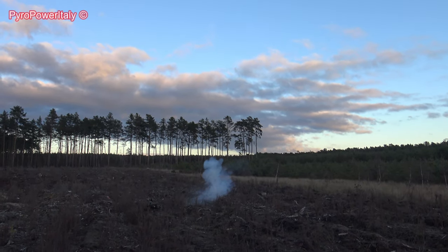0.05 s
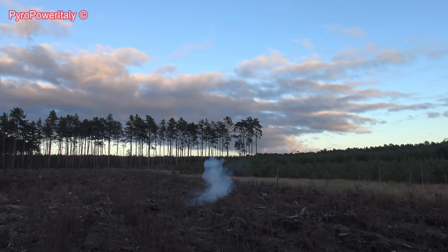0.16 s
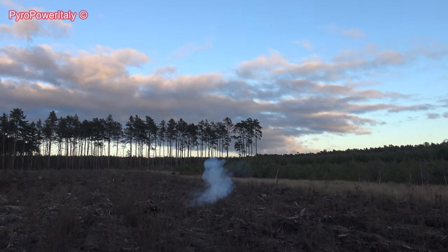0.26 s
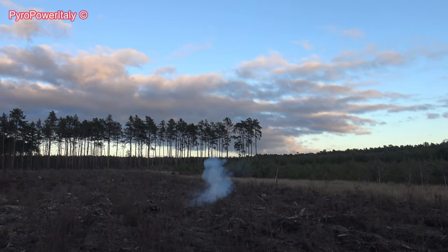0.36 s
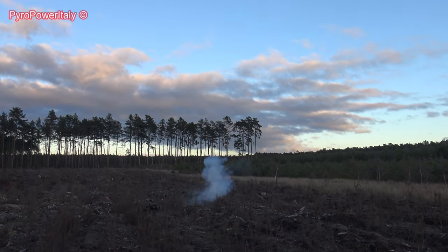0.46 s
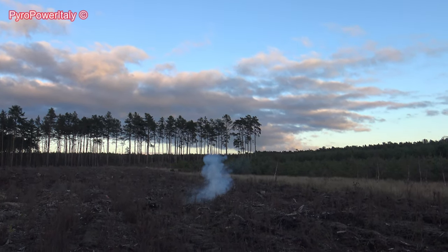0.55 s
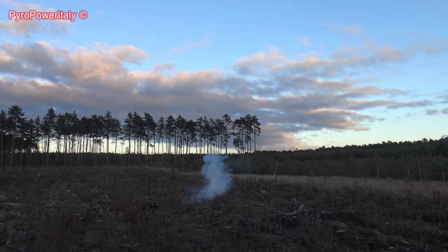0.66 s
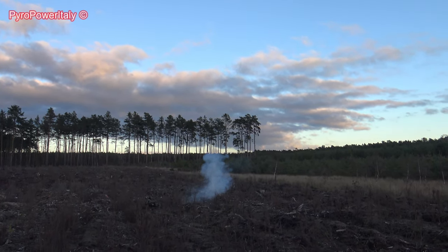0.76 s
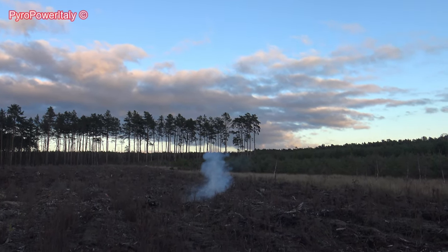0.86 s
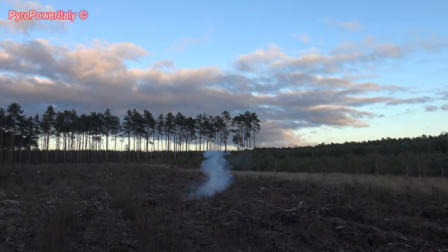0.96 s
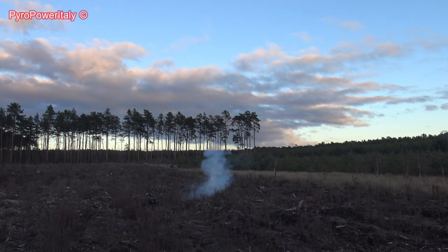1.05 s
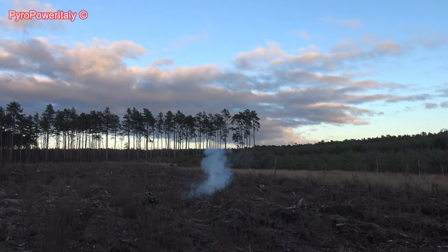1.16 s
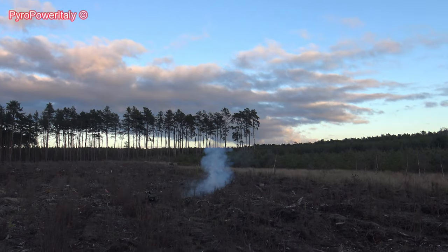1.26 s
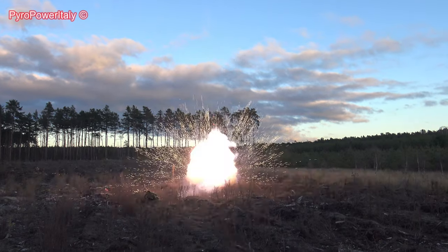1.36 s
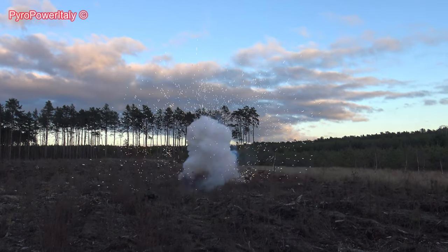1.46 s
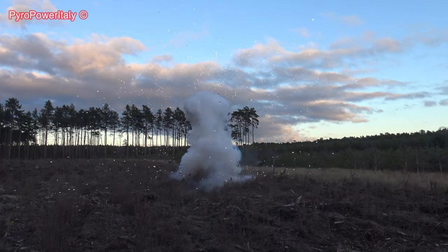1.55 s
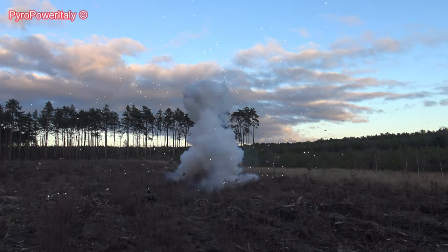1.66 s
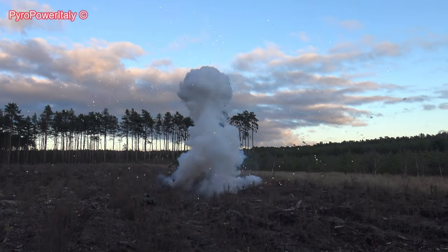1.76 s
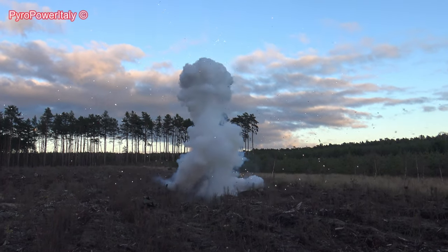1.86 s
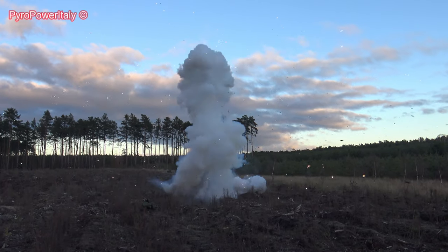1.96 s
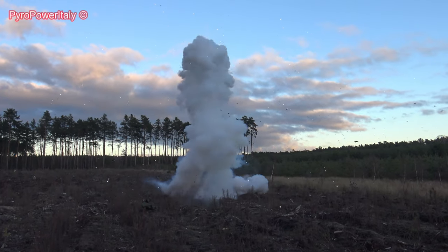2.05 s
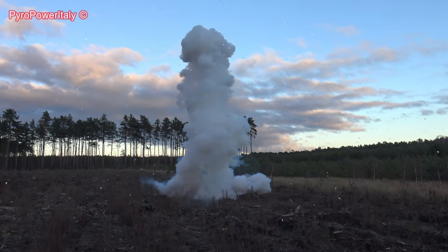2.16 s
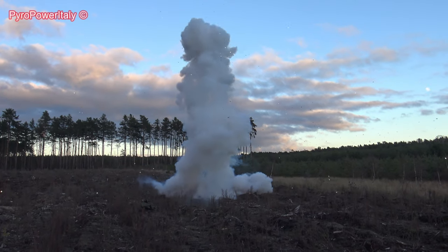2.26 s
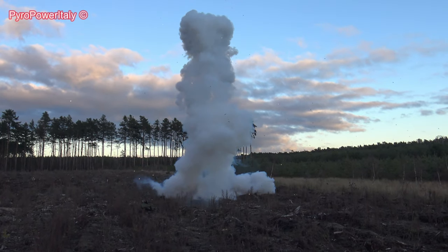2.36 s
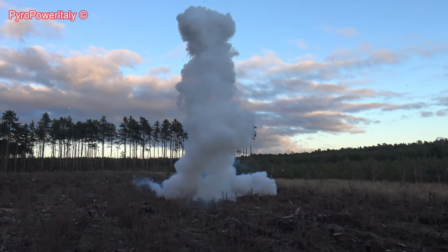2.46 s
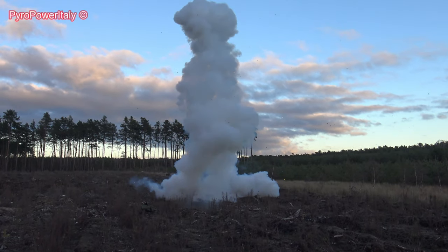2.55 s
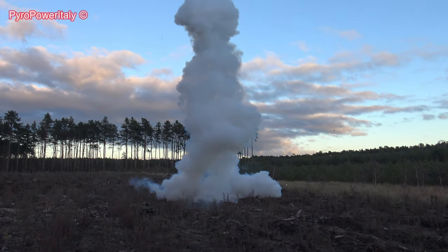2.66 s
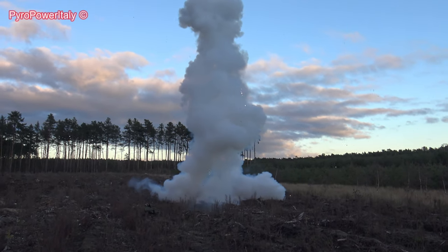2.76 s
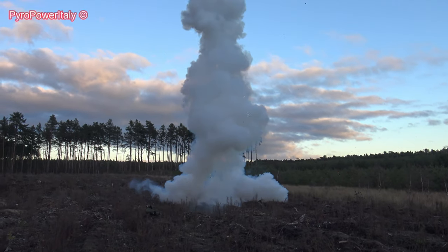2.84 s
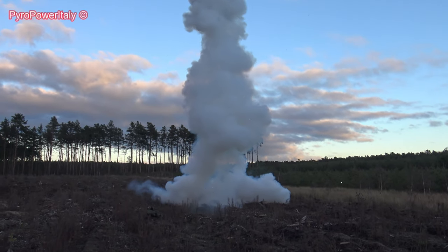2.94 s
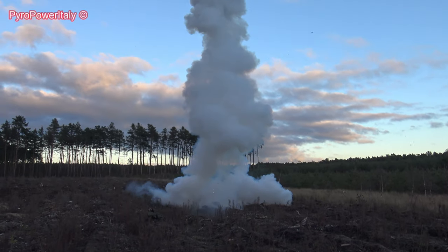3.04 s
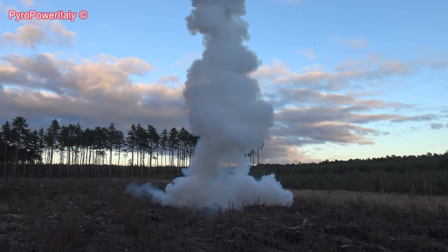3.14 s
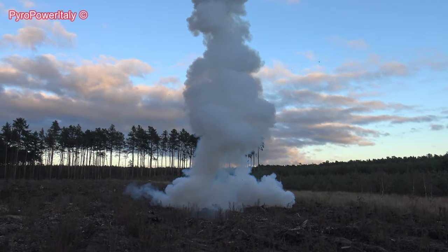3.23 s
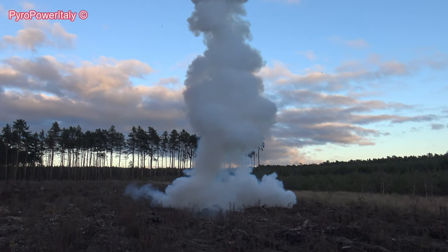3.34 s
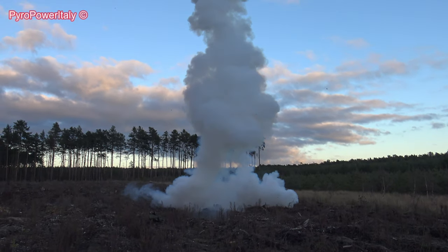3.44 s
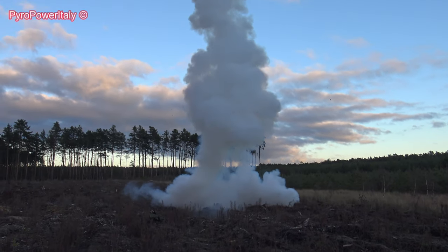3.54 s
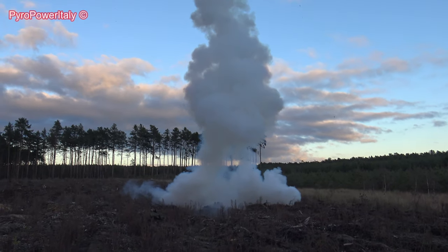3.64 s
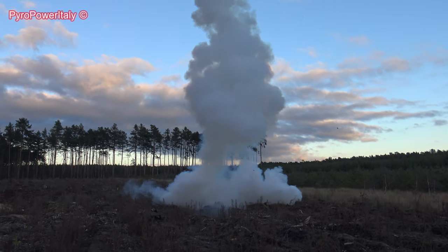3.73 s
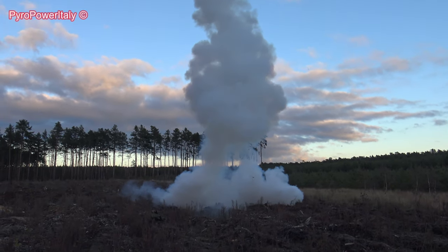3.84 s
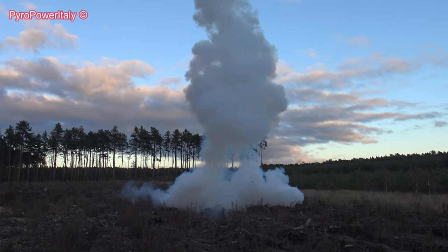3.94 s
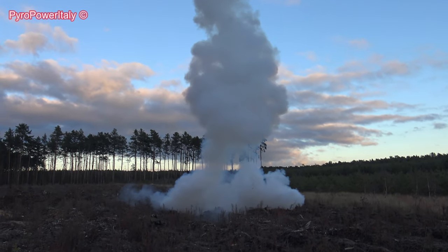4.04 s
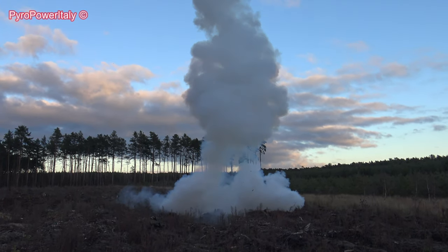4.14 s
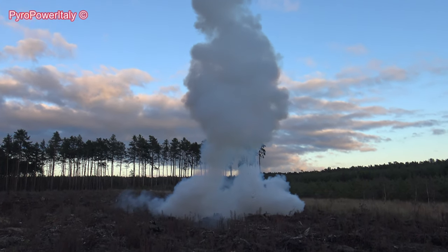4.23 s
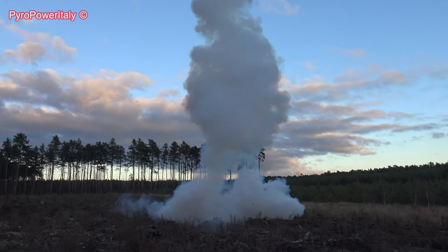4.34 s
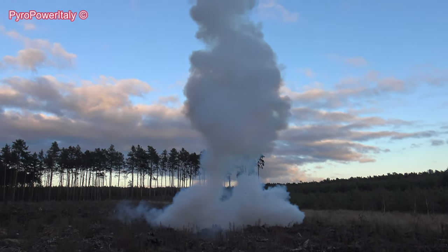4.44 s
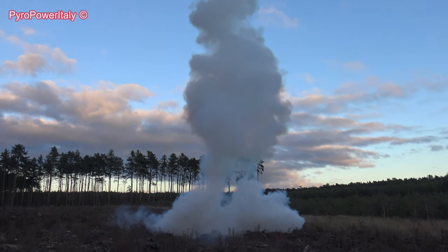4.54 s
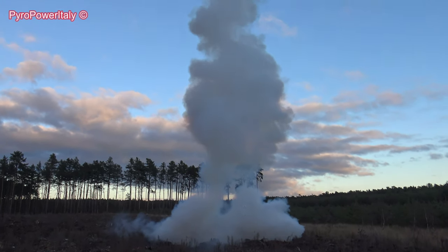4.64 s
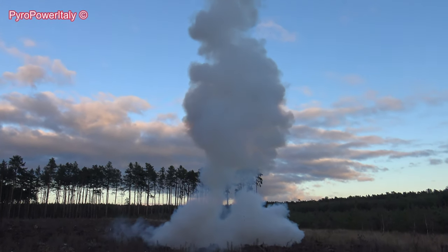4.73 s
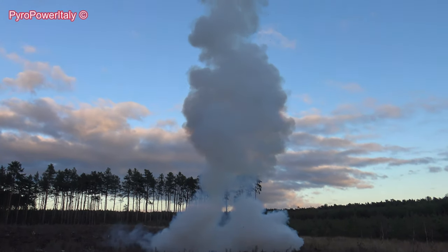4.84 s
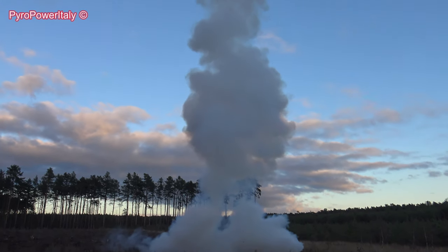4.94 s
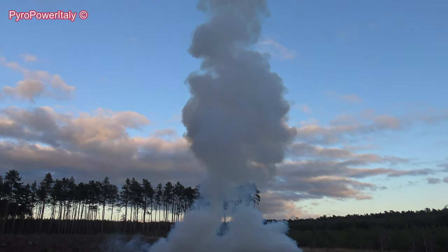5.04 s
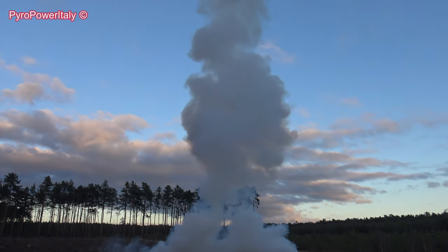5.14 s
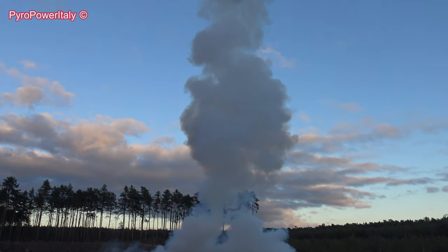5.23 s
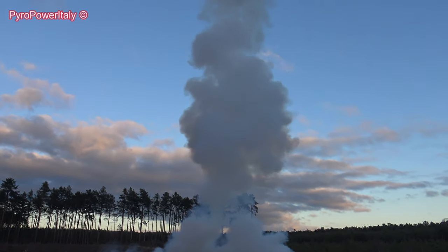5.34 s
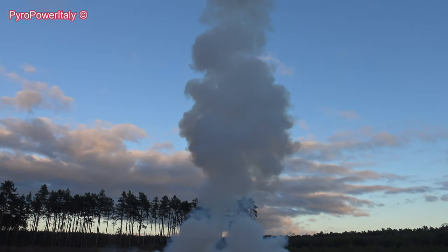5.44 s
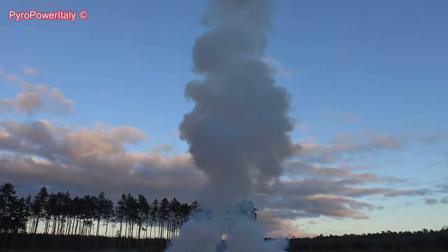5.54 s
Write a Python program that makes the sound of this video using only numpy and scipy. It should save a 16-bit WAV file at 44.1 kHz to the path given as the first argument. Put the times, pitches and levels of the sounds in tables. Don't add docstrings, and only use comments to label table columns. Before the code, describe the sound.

Outdoors in a forest clearing, a burning fuse hisses steadily near the stereo microphone, its bright sputter stopping early. It flares for an instant and a huge blast overloads the microphone, a crackling clipped boom. The tree line returns a long, washing echo that grows duller over deep rumble, while small debris ticks and soil patters on dry brush.

```python
import sys
import numpy as np
from scipy import signal
from scipy.fft import rfft, irfft, next_fast_len
from scipy.io import wavfile
from scipy.ndimage import uniform_filter1d, minimum_filter1d

SR = 44100
rng = np.random.default_rng(int(sys.argv[2]) if len(sys.argv) > 2 else 0)


def dump(signal):
    limited = np.clip(np.atleast_2d(signal).T, -1, 1)
    pcm = np.round(limited * 32767).astype(np.int16)
    wavfile.write(sys.argv[1], SR, pcm)


def how_loud(loudness_db):
    steps = np.asarray(loudness_db, float) / 20
    return 10 ** steps


N = 246519
TIME = np.arange(N) / SR
BURST_S, BOOM_S = 1.473, 1.4842
RAIL, SUCTION = 1.35, 2.3

# pitch_hz, likeness (1 = same)
NEAR_LIKENESS = [(60, -0.22), (180, 0.53), (550, 0.96), (1650, 1), (4970, 0.88), (15000, 0.57)]


def unit(x):
    return x / np.sqrt(np.mean(x ** 2) + 1e-20)


def along(points, hz):
    f, v = np.transpose(points)
    return np.interp(np.log(hz + 1), np.log(f + 1), v)


def curves(rows):
    s, *cols = np.transpose(rows)
    return np.array([np.interp(TIME, s, c) for c in cols])


def past(s):
    return np.maximum(TIME - s, 0)


def until(s):
    return np.maximum(s - TIME, 0)


def blend(*gains):
    return np.sqrt(sum(g ** 2 for g in gains))


def rush(spectrum, alike, patchy_db, spiky_db=0, extra_db=lambda hz, t: 0 * t):
    grain = uniform_filter1d(rng.standard_normal(N), size=40)
    noise = rng.standard_normal((2, N)) * how_loud(spiky_db * unit(grain))
    hz, t, z = signal.stft(noise, SR, nperseg=1024)
    field = rng.standard_normal(z.shape[1:])
    for axis in (0, 1):
        field = uniform_filter1d(field, size=6, axis=axis)
    shape = how_loud(along(spectrum, hz)[:, None] + extra_db(hz, t))
    shape = shape / np.sqrt(np.mean(shape ** 2, axis=0))
    turn = np.arccos(np.clip(along(alike, hz), -1, 1))[:, None] / 2
    spread = np.array([np.cos(turn), np.sin(turn)])
    mid, side = z * shape * how_loud(patchy_db * unit(field)) * spread
    _, stereo = signal.istft(np.array([mid + side, mid - side]), SR, nperseg=1024)
    return unit(stereo[:, :N])


def drone(spectrum, alike):
    turn = np.arccos(np.clip(alike, -1, 1)) / 2
    m = next_fast_len(N)
    colour = how_loud(along(spectrum, np.fft.rfftfreq(m, 1 / SR)))
    mid, side = irfft(rfft(rng.standard_normal((2, m))) * colour, m)[:, :N]
    x = unit(np.cos(turn) * mid + np.sin(turn) * np.array([side, -side]))
    lumps = uniform_filter1d(np.mean(x ** 2, axis=0), size=2200)
    return unit(x / np.sqrt(0.66 + np.abs(lumps)))


def capsule_hiss():
    # pitch_hz, level_db per Hz
    hiss_colour = [(1000, -22), (3000, -2), (8000, -4), (15700, -8)]
    return how_loud(-60.5) * rush(hiss_colour, [(3000, .1)], patchy_db=.5)


def caught(swell_db):
    catch_s, rise_s = 1.41, .03
    return how_loud(swell_db * np.minimum(past(catch_s) / rise_s, 1))


def jet():
    # pitch_hz, level_db per Hz
    jet_colour = [(70, -40), (130, -7.5), (350, -4.5), (700, -7), (1100, -5.5), (1600, -1.5), (2200, -7),
                  (2800, -13), (3400, -13), (5000, -18.5), (7000, -24.5), (8200, -24), (11000, -32.5),
                  (15500, -38.5)]
    return how_loud(-33.8) * caught(3.5) * rush(jet_colour, NEAR_LIKENESS, patchy_db=1.0)


def sparks():
    # pitch_hz, level_db per Hz
    spark_colour = [(2000, -27), (4000, -1.5), (8500, -2.5), (12000, -8), (15500, -18)]
    sputter_end_s, dies_db_per_s, embers_grow_s = .385, 300, .35
    sputter = how_loud(-40.5 - dies_db_per_s * past(sputter_end_s))
    embers = how_loud(-52) * np.minimum(past(sputter_end_s) / embers_grow_s, 1)
    noise = rush(spark_colour, NEAR_LIKENESS, patchy_db=2.5, spiky_db=1.0)
    return blend(sputter, embers) * caught(10) * noise


def wind():
    # pitch_hz, level_db per Hz
    wind_colour = [(15, -32), (30, -3), (57, 3.5), (85, -16), (130, -12.5), (300, -19.5), (600, -44),
                   (1200, -120)]
    return how_loud(-36) * caught(12) * drone(wind_colour, alike=-.1)


def fuse():
    return how_loud([[-.9], [.9]]) * (jet() + sparks() + wind()) * (TIME < BURST_S)


def flare():
    # pitch_hz, level_db per Hz
    flash_colour = [(200, -11), (1000, -1), (1800, 1), (4000, -4), (9000, -7), (15500, -17)]
    full_s, rise_db_per_s, fall_db_per_s = 1.463, 1000, 650
    glow_fall_db_per_s, glow_end_s, glow_out_db_per_s = 40, 1.63, 310

    def cooling(hz, t):
        lost_db = along([(2500, 0), (6000, -7), (15000, -14.5)], hz)
        return lost_db[:, None] * np.clip((t - BURST_S) / 0.13, 0, 1)

    roar_db = -9.5 - rise_db_per_s * until(full_s) - fall_db_per_s * past(BURST_S)
    glow_db = -19 - glow_fall_db_per_s * past(BURST_S) - glow_out_db_per_s * past(glow_end_s)
    level = blend(how_loud(roar_db), how_loud(glow_db) * (TIME > BURST_S))
    return level * rush(flash_colour, [(1000, 0.76)], patchy_db=-2.0, spiky_db=2.0, extra_db=cooling)


def shock():
    # start_s, length_s, left, right (full scale 1)
    fronts = [
        (1.4728, .0006, 4, 4),
        (1.4748, .0008, 2.5, 1.1),
        (1.4781, .0009, 2.5, 2.4),
        (1.4784, .0018, 1.1, 2.2),
        (1.4796, .0042, 2.15, 2.1),
    ]
    rise_s = .0002
    lifts = []
    for s, length, *size in fronts:
        jump = np.minimum(past(s) / rise_s, 1)
        sag = 1 - np.minimum(past(s) / length, 1) ** 5
        lifts.append(np.outer(size, jump * sag))
    suction = SUCTION * (TIME > fronts[0][0] + rise_s)
    return (np.max(lifts, axis=0) - suction) * (TIME <= BOOM_S)


def boom():
    # start_s, room from boom crest to capsule stop (full scale 1), swing_db of the boom
    relief = [(1.4895, 1.0, 18), (1.4955, .66, 4), (1.545, .55, -1), (1.57, 1.15, -4), (1.598, .95, -8),
              (1.622, 1.4, -3), (1.638, .5, -14), (1.655, .2, -40), (3, 2.5, -60)]
    crest_s, end_hz, start_hz, sag_s = 1.4895, 100, 157, .04
    waver_cycles, waver_hz, waver_s = .2, 28, 1.499
    heave_hz, heave_crest_s, fades_s = 39.5, 1.5345, .09
    t = np.maximum(TIME, BOOM_S) - crest_s
    fading = np.exp(-t / fades_s)
    waver = waver_cycles * fading * np.sin(2 * np.pi * waver_hz * (TIME - waver_s))
    waver = waver * np.clip(start_hz * t, 0, 1)
    cycles = end_hz * t + (start_hz - end_hz) * sag_s * (1 - np.exp(-t / sag_s))
    cycles = np.maximum(cycles, -.5) + waver
    heave = fading * np.cos(2 * np.pi * heave_hz * (TIME - heave_crest_s))
    crest, swing_db = curves(relief)
    crest = crest + .36 * heave + .4 * fading * np.array([[-.5], [.5]])
    swing_db = swing_db + 1.5 * heave - 5 * fading * np.array([[0], [1]])
    ringing = -RAIL + crest + how_loud(swing_db) * (np.cos(2 * np.pi * cycles) - 1)
    return np.maximum(ringing, -SUCTION) * (TIME > BOOM_S)


def thud():
    # pitch_hz, level_db per Hz
    thud_colour = [(40, -120), (60, -31), (80, -3), (105, 0), (130, -7), (200, -10), (320, -17),
                   (600, -120)]
    fall_db_per_s = 13.5
    level = blend(how_loud(-12.5 - fall_db_per_s * past(BURST_S)), how_loud(-46))
    return level * drone(thud_colour, alike=0.74)


def rumble():
    # pitch_hz, level_db per Hz
    rumble_colour = [(15, -22), (28, -2.5), (42, 0.5), (58, 9.5), (72, -3), (90, -29), (140, -120)]
    full_s, holds_s, rise_db_per_s, fall_db_per_s = 2.1, 1.05, 20, 7
    level_db = -20 - rise_db_per_s * until(full_s) - fall_db_per_s * past(full_s + holds_s)
    return how_loud(level_db) * drone(rumble_colour, alike=0.9)


def trees():
    # start_s, level_db
    echo = [(1.48, -30), (1.495, -14), (1.55, -16.5), (1.575, -24), (1.625, -22.5), (1.645, -12.5),
            (1.75, -14.5), (2.2, -12.5), (2.8, -10), (3.2, -11.3), (3.72, -12.5), (3.8, -15), (4.4, -17.5),
            (4.95, -18.5), (5.1, -20.5), (5.59, -23.5)]
    # pitch_hz, level_db per Hz
    tree_colour = [(90, -59), (140, -22), (250, -9.5), (400, -3), (600, .5), (900, -3), (1400, -6.5),
                   (2850, -17.5), (5000, -29), (7330, -37), (11000, -54), (15500, -70)]
    # pitch_hz, extra_db per second of travel
    fade = [(130, 3), (220, 2.4), (350, 1.7), (600, 0), (1400, -4), (2800, -10), (5000, -21), (9000, -35),
            (15000, -40)]
    # pitch_hz, extra_db
    stubble = [(120, 0), (240, 11), (450, 0), (700, -2.5), (1600, 1.5), (4000, 0)]
    # pitch_hz, likeness of left and right
    tree_likeness = [(60, 0.87), (240, 0.68), (950, 0.69), (3770, 0.66), (15000, 0.17)]
    # centre_s, spread_s, extra travel_s, left-right_db
    stands = [(1.49, .04, .95, 0), (1.58, .03, -.45, 0), (1.78, .13, -.07, 0), (2.25, .2, -.12, 0),
              (2.95, .35, .25, 0), (3.7, .35, -.4, .8), (4.1, .3, -.08, 1.2), (5.1, .6, -.15, 0)]
    travel_zero_s, travel_per_s, stubble_fades_s = 1.98, .9, .3
    left_edge_s, left_edge_fades_s = 1.64, .4
    detour, aside = sum(np.outer(extra, np.exp(-((TIME - s) / spread) ** 2))
                        for s, spread, *extra in stands)
    travel = travel_per_s * (TIME - travel_zero_s) + detour
    left_edge = np.exp(-past(left_edge_s) / left_edge_fades_s) * (TIME > left_edge_s)
    pan_db = -.6 + aside + 7.5 * left_edge

    def air(hz, t):
        distance_db = along(fade, hz)[:, None] * np.interp(t, TIME, travel)
        ground_db = along(stubble, hz)[:, None] * np.exp(-np.abs(t - BURST_S) / stubble_fades_s)
        return distance_db + ground_db

    level_db, = curves(echo)
    level = how_loud(level_db + np.array([pan_db, -pan_db]) / 2) * (TIME > BURST_S)
    return level * rush(tree_colour, tree_likeness, patchy_db=0.97, spiky_db=1.5, extra_db=air)


def forest():
    arrive = np.clip((TIME - BURST_S) / .2, 0, 1) ** 4
    return arrive * (thud() + rumble()) + trees()


def patter():
    # pitch_hz, level_db per Hz
    brush_colour = [(2500, -30), (5000, -4), (8000, 0.5), (12000, -12), (15700, -9)]
    # peak_s, level_db, time to fall 10 dB_s
    handfuls = [(2.55, -63, .05), (2.635, -52, .09), (2.8, -62, .04), (3.03, -61, .12), (3.27, -55, .2),
                (3.36, -57, .06), (3.555, -50.5, .15), (3.82, -59, .05)]
    rise, drizzle_s, drizzle_fall_db_per_s = .45, 2.3, 3.5
    falls = [how_loud(db - 10 * (until(s) / rise + past(s)) / fall) for s, db, fall in handfuls]
    drizzle = how_loud(-68.5 - drizzle_fall_db_per_s * past(drizzle_s))
    level = blend(drizzle, *falls) * (TIME > drizzle_s)
    return level * rush(brush_colour, [(8000, .4)], patchy_db=-3.0, spiky_db=4)


def ticks():
    # start_s, level_db at the peak, left-right_db
    bits = [(2.34, -44, 0), (2.395, -42, 0), (2.487, -44, 0), (3.39, -46, -3), (4.38, -46, -2),
            (2.5557, -37.5, 0.0), (2.635, -31.5, -8.0), (2.672, -33.5, -4), (2.7967, -36.5, -5.5),
            (2.9239, -43, 2.0), (2.9733, -48, -2.5), (3.0347, -46.5, -6.5), (3.1998, -45, -2),
            (3.4946, -39, -3), (3.5475, -44, -6.5), (3.555, -42, -8), (3.772, -40, -6.5),
            (3.9835, -38, -0.5), (4.208, -46, -1.0), (4.443, -39, -4), (4.5053, -41, -2.0),
            (4.7647, -46, 3.0), (4.8101, -42, -5.5), (5.2017, -45, -1.0)]
    hits, t = np.zeros((2, N + SR)), np.arange(SR // 50) / SR
    for s, db, pan in bits:
        decay = how_loud(-60 * t / 0.0033) + 0.33 * how_loud(-60 * t / .03)
        crack = rng.standard_normal(len(t)) * decay
        start = round(s * SR)
        hits[:, start:start + len(t)] += how_loud(db + .3 + np.array([[pan / 2], [-pan / 2]])) * crack
    twig = signal.butter(1, [4000, 10500], "band", fs=SR, output="sos")
    return signal.sosfilt(twig, hits[:, :N])


def scene():
    return capsule_hiss() + fuse() + flare() + shock() + boom() + forest() + patter() + ticks()


def low_pass(x):
    return signal.sosfilt(signal.butter(12, 15690, fs=SR, output="sos"), x)


def record(dry):
    treble = signal.sosfilt(signal.butter(2, 700, "high", fs=SR, output="sos"), dry)
    trembling = how_loud(-12.5) * treble * (dry < -RAIL)
    stopped = np.maximum(dry, -RAIL) + trembling
    coupled = signal.sosfilt(signal.butter(2, 38, "high", fs=SR, output="sos"), stopped)
    need = np.minimum(1, .93 / (np.abs(coupled).max(axis=0) + 1e-9))
    gain = uniform_filter1d(minimum_filter1d(need, size=300), size=300)
    limited = coupled * np.where(TIME > BURST_S + .3, gain, 1)
    return low_pass(np.clip(limited, -.98, .98))


dry = scene()
out = record(dry)
dump(out)
```